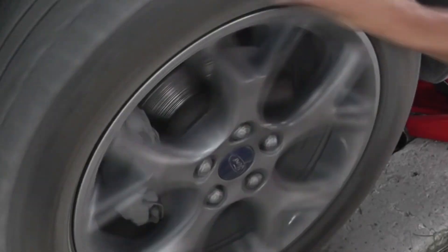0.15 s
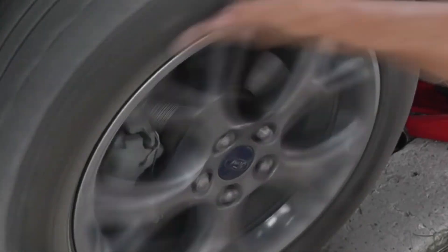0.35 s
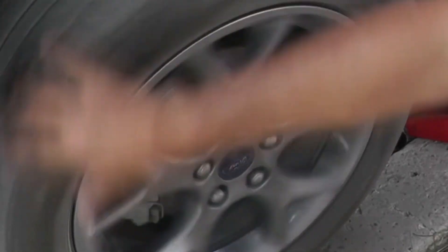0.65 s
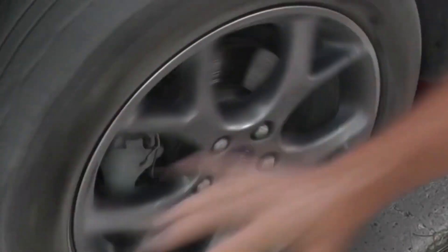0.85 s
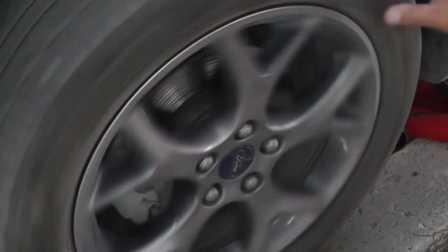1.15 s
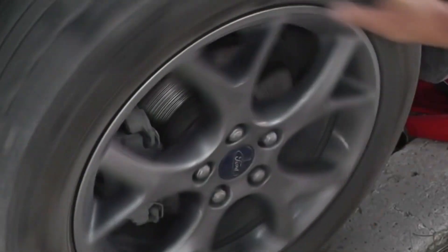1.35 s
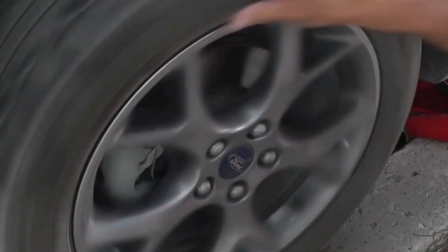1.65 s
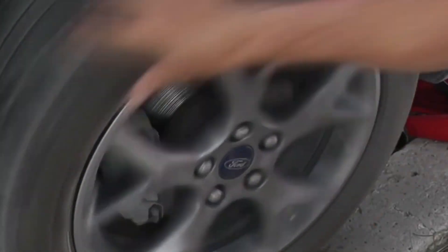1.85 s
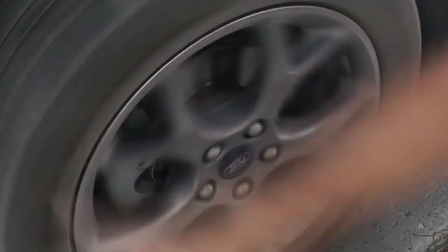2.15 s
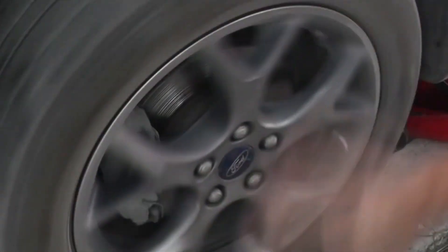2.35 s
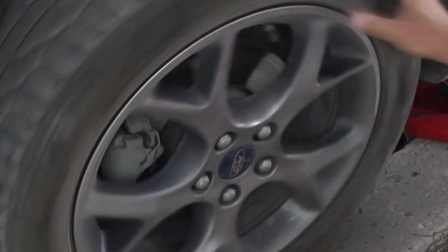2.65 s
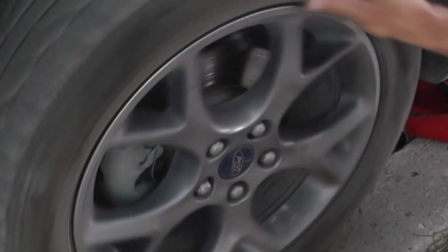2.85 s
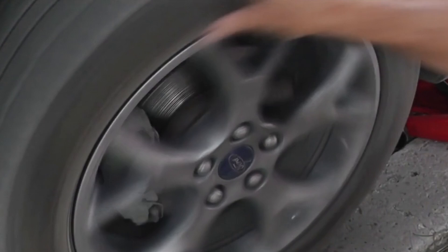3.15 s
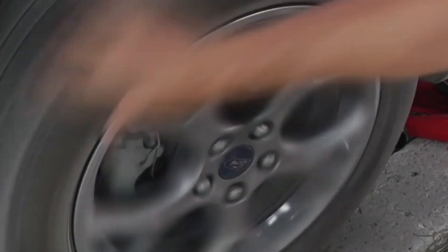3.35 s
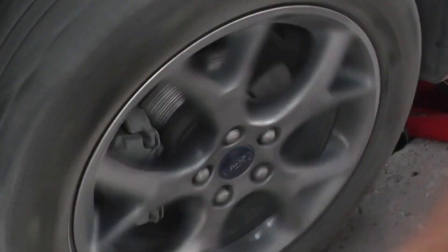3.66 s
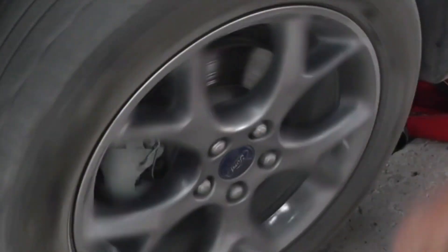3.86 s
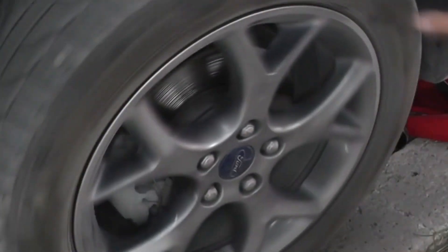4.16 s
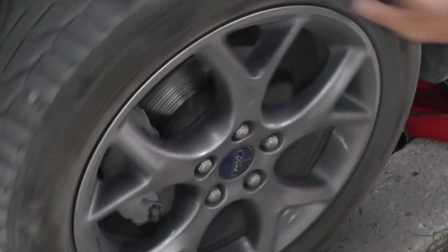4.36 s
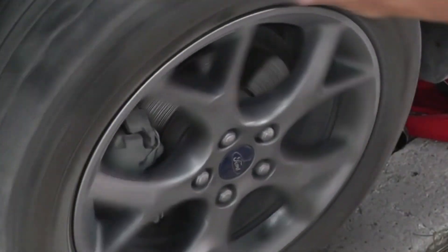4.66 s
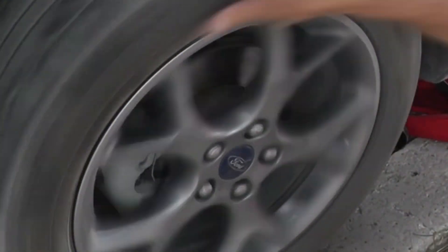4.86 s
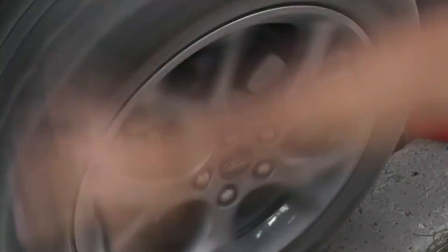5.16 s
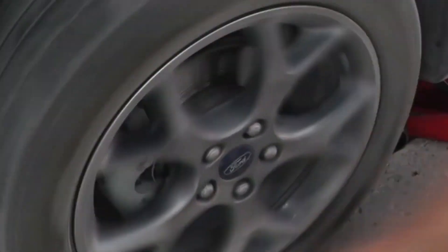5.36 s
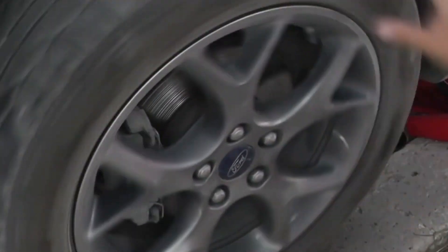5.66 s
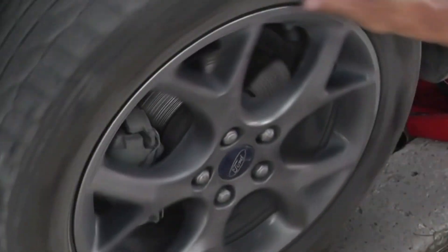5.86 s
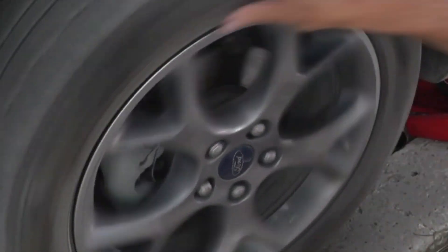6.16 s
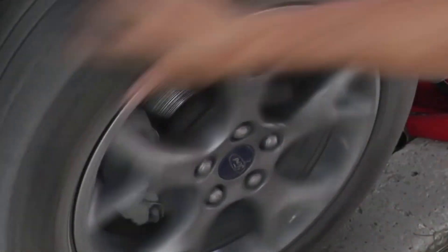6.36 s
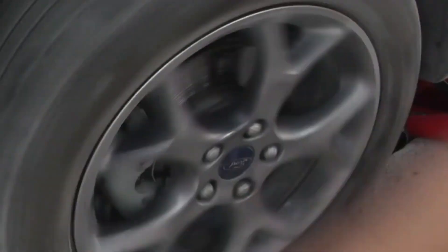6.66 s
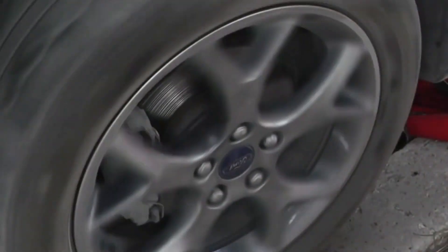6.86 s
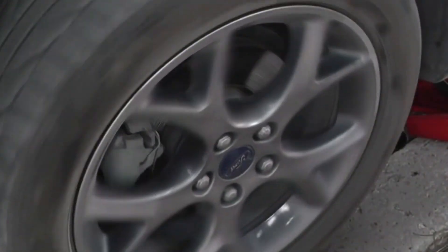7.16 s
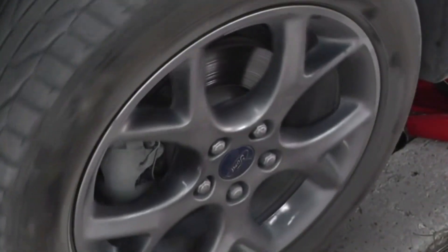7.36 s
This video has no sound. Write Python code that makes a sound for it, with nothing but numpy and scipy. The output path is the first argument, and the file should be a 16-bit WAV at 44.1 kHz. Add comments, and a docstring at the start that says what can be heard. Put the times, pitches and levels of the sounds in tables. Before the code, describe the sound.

Close, dry, single-channel sound of a jacked-up car wheel spun by hand. Worn pads on the disc give a very high, thin, piercing squeal that stutters on and off, sometimes joined by a second, lower one. Beneath is a continuous gritty, hissing scrape that swells with each push and sags as the wheel slows, plus a low rumble and occasional soft palm thumps on rubber.

```python
"""Two piercing squeals, about 7.2 and 5.1 kHz, come and go in bouts over a gritty scrape, a low rumble
and faint hums; soft thumps fall between. A jacked-up car wheel is spun by hand while worn brake pads drag
on the disc. Squeals are faltering sines from two self-excited disc modes; the scrape is coloured noise and
resonances rung by grit; hums are wavering tones blended with narrow noise; a palm's noise bursts ring
the tyre."""
import sys
import numpy as np
from scipy import signal
from scipy.io import wavfile
from scipy.ndimage import uniform_filter1d

SR = 44100
rng = np.random.default_rng(int(sys.argv[2]) if len(sys.argv) > 2 else 0)


def generate_wav(signal):
    """Clip the signal to [-1, 1] and save it as 16-bit WAV at the path in sys.argv[1]."""
    frames = np.transpose(np.atleast_2d(signal))
    scaled = np.clip(frames, -1, 1) * 32767
    pcm = np.round(scaled).astype(np.int16)
    wavfile.write(sys.argv[1], SR, pcm)


N = 330388
TIME = np.arange(N) / SR


def squeals():
    """Friction makes two disc modes squeal by themselves, in bouts with a slightly wandering pitch."""
    # bouts: caught/s, let go/s, level when caught/dB, level when let go/dB
    high_bouts = [(0.0, 0.02, -37, -48), (0.1, 0.2, -40, -45.5), (0.245, 0.29, -35.5, -44),
                  (0.377, 0.49, -31.5, -32), (0.56, 0.67, -22, -22), (0.68, 0.85, -19.5, -25.5),
                  (0.9, 1.12, -21, -26.5), (1.13, 1.235, -27, -35.5), (1.63, 1.68, -33, -42),
                  (1.72, 1.79, -19, -17), (1.82, 2.02, -30, -18), (2.05, 2.255, -16.5, -13),
                  (2.3, 2.5, -30, -29.5), (2.53, 2.57, -25, -22), (2.63, 2.77, -38.5, -39),
                  (2.97, 3.04, -46, -37.5), (3.25, 3.28, -38, -51), (3.33, 3.8, -20, -22.5),
                  (3.845, 3.98, -21, -20.5), (4.01, 4.15, -25.5, -29), (4.18, 4.255, -36, -41.5),
                  (4.75, 4.85, -28.5, -27.5), (4.89, 4.995, -19, -22), (5.02, 5.08, -27.5, -28),
                  (5.11, 5.24, -15.5, -25.5), (5.28, 5.57, -20.5, -23.5), (5.62, 5.7, -34.5, -24.5),
                  (5.72, 5.82, -30, -33), (5.84, 6.0, -35, -28), (6.02, 6.07, -30.5, -38),
                  (6.09, 6.2, -32.5, -30), (6.22, 6.46, -23.5, -30), (6.495, 6.64, -22, -17.5),
                  (6.66, 6.9, -22, -25.5), (6.945, 7.055, -16, -24.5), (7.08, 7.14, -33.5, -33),
                  (7.17, 7.18, -21.5, -24.5), (7.21, 7.29, -34, -34.5), (7.32, 7.49, -27.5, -40)]
    low_bouts = [(0.0, 0.07, -41, -39), (0.116, 0.3, -27, -25), (0.37, 0.46, -23.5, -21),
                 (0.47, 0.5, -19.5, -23), (0.575, 0.64, -28, -31.5), (0.67, 0.78, -39, -45),
                 (0.83, 0.84, -53, -52), (0.89, 0.94, -46, -44), (0.96, 1.03, -50, -47),
                 (1.05, 1.08, -41, -45), (1.13, 1.14, -50, -57), (1.2, 1.22, -42, -51),
                 (1.33, 1.5, -29.5, -39.5), (1.52, 1.75, -38, -39.5), (1.79, 1.82, -50, -55),
                 (1.89, 1.94, -54, -54), (2.02, 2.05, -51, -51), (2.14, 2.18, -50, -52),
                 (2.26, 2.38, -48, -53), (2.445, 2.45, -51, -50), (2.5, 2.61, -45, -49),
                 (2.66, 2.98, -40, -42.5), (3.04, 3.12, -30.5, -37), (3.2, 3.37, -48, -33),
                 (3.46, 3.68, -49, -47), (3.72, 3.8, -48, -36.5), (3.995, 4.16, -37.5, -28),
                 (4.2, 4.29, -29.5, -39), (4.33, 4.44, -39, -33), (4.48, 4.75, -41, -45.5),
                 (4.8, 4.93, -58, -58), (5.29, 5.3, -45, -45), (5.65, 5.76, -44, -60),
                 (5.8, 6.14, -43.5, -39), (6.35, 6.39, -42, -42), (6.49, 6.54, -48, -36),
                 (6.56, 6.7, -41, -66), (6.79, 6.84, -40, -33.5), (6.86, 7.23, -39, -37),
                 (7.295, 7.41, -20, -25.5), (7.455, 7.49, -30.5, -33.5)]
    # pitch of each squeal: t/s, f/Hz
    high_pitch = [(0.0, 7154), (0.45, 7156), (0.6, 7162), (0.85, 7158), (1.2, 7163), (1.63, 7171),
                  (1.8, 7161), (2.0, 7170), (2.28, 7161), (2.52, 7167), (2.7, 7159), (3.27, 7153),
                  (3.77, 7166), (4.2, 7163), (4.75, 7168), (5.0, 7164), (5.1, 7176), (5.3, 7167),
                  (5.6, 7168), (5.75, 7162), (6.45, 7163), (6.78, 7156), (6.93, 7167), (7.2, 7167),
                  (7.49, 7161)]
    low_pitch = [(0.0, 5109), (0.45, 5105), (0.66, 5105), (0.9, 5115), (1.35, 5112), (1.75, 5107),
                 (2.4, 5103), (2.66, 5109), (3.05, 5103), (3.38, 5093), (3.8, 5105), (4.0, 5115),
                 (4.3, 5115), (4.45, 5107), (4.85, 5101), (5.75, 5109), (6.15, 5108), (6.35, 5096),
                 (6.85, 5099), (7.25, 5114), (7.49, 5119)]
    # deeper moments when a squeal falters: t/s, depth/dB, length at half depth/ms
    high_breaks = [(0.574, 8.5, 13), (0.715, 8, 30), (0.791, 9, 17), (0.819, 4, 15), (0.863, 3.5, 24),
                   (0.886, 10, 9), (1.034, 10, 18), (1.192, 10, 12), (1.755, 9.5, 44), (1.85, 6, 8.3),
                   (1.93, 12, 13), (1.975, 13, 17), (2.028, 17, 49), (2.096, 11, 24), (2.138, 6, 20),
                   (2.2, 9, 94), (2.243, 6.5, 8.8), (2.283, 17, 35.4), (2.33, 39, 25.5), (2.369, 16.5, 10),
                   (2.4, 19, 12), (3.38, 6, 11), (3.543, 7.5, 19), (3.569, 13, 16), (3.606, 6, 22),
                   (3.661, 12, 10), (3.703, 8, 8), (3.782, 16.5, 29), (3.826, 18, 22), (3.846, 18, 14),
                   (3.937, 2.5, 18), (4.835, 8, 20), (5.045, 16, 8.8), (5.068, 12, 4.4), (5.139, 5, 55),
                   (5.385, 5.5, 22), (5.527, 5.5, 51), (5.946, 15.5, 26), (6.29, 5.5, 26), (6.331, 8, 7.5),
                   (6.357, 3, 9), (6.385, 0, 9), (6.416, 25, 5.7), (6.508, 15, 8.4), (6.531, 6.5, 17),
                   (6.558, 6.5, 14), (6.601, 11.5, 34), (6.708, 11, 7.4), (6.753, 9, 12), (6.777, 14, 10),
                   (6.814, 13, 28), (6.867, 7, 20), (6.986, 8.5, 103)]
    low_breaks = [(0.176, 9.4, 57), (0.255, 14, 51), (0.336, 5.3, 17), (0.38, 7.7, 11), (0.535, 11.3, 38),
                  (0.62, 5.7, 12), (0.69, 9.9, 15), (0.765, 9.2, 15), (0.97, 6, 15), (1.444, 7.6, 28),
                  (1.548, 21, 23), (1.6, 6.6, 13), (1.63, 6.2, 10), (1.68, 7.8, 22), (2.31, 6, 15),
                  (2.53, 5, 15), (2.7, 5, 17), (2.755, 5, 16), (2.819, 10, 15), (2.895, 5.4, 15),
                  (2.98, 6.6, 48), (3.49, 8, 15), (3.6, 6.9, 30), (4.69, 8.6, 21), (5.745, 9.2, 18),
                  (4.028, 11, 24), (4.592, 16, 20), (5.945, 6.1, 26), (6.071, 14, 27), (7.008, 8.7, 27),
                  (7.033, 11, 21), (7.317, 2.6, 43), (7.43, 12, 26), (0.79, 9, 15), (6.3, 9, 15),
                  (6.33, 12, 12), (6.44, 6, 15), (6.62, 6, 15), (2.57, 6, 15), (2.63, 7, 15)]

    high_db = bout_level(high_bouts, grow_db_per_s=385, die_db_per_s=335)
    low_db = bout_level(low_bouts, grow_db_per_s=327, die_db_per_s=289)
    (high_hz,) = curves(high_pitch)
    (low_hz,) = curves(low_pitch)
    # each octave is heard through a higher mode of the disc: (Hz, width Hz)
    high = squeal(high_db, high_hz, high_breaks, flutter_db=0.9, waver_hz=3.5, fuzz_db=-18.5,
                  octave_db=-38, octave_mode=(14328, 80))
    low = squeal(low_db, low_hz, low_breaks, flutter_db=1.1, waver_hz=3.5, fuzz_db=-18,
                 octave_db=-21, octave_mode=(10234, 16))
    return high + low


def bout_level(rows, grow_db_per_s, die_db_per_s):
    """A mode grows quickly to each catch and rings down when let go; the strongest bout holds."""
    level_db = np.full(N, -90.0)
    for on_s, off_s, on_db, off_db in rows:
        held_db = np.interp(TIME, [on_s, max(off_s, on_s + 1e-3)], [on_db, off_db])
        held_db -= grow_db_per_s * np.maximum(on_s - TIME, 0)
        held_db -= die_db_per_s * np.maximum(TIME - off_s, 0)
        level_db = np.maximum(level_db, held_db)
    return level_db


def squeal(level_db, hz, breaks, flutter_db, waver_hz, fuzz_db, octave_db, octave_mode):
    """A near sine that falters, catches again at a new phase, and carries a thin skirt of noise."""
    slip_rad = np.zeros(N)  # per sample
    jumps = rng.uniform(-0.983, 1, len(breaks))
    for (t_s, depth_db, length_ms), jump in zip(breaks, jumps):
        dip = bell(t_s, length_ms / 1000)
        level_db = level_db - depth_db * dip
        # deeper breaks shift the phase further
        slip_rad += jump * np.pi * min(depth_db / 20, 1) * dip / dip.sum()
    wavering_hz = hz + waver_hz * drift(0.019)
    phase = np.cumsum(2 * np.pi * wavering_hz / SR + slip_rad)
    tone = np.sqrt(2) * np.sin(phase)
    fuzz = amp(fuzz_db) * (drift(0.012) * np.cos(phase) + drift(0.012) * np.sin(phase))
    # the pad presses harder one way than the other: a faint octave, stronger in loud squeals
    octave = amp(octave_db + 0.2 * (level_db + 25)) * np.cos(2 * phase)
    gain = amp(level_db + flutter_db * drift(0.015))
    return gain * (tone + fuzz) + ring(gain * octave, *octave_mode)


def scrape():
    """Grit under the pads: three colours of noise and the modes it rings, with valleys and hollows."""
    # noise colours, normalised afterwards: f/Hz, relative density/dB per Hz
    scrape_colour = [(600, -17), (1500, -5.5), (1900, -6), (2300, -6.5), (2700, -5.5), (3300, -4),
                     (4500, -4), (5400, 4.5), (6300, -6), (7100, 3), (7800, -6), (8200, -33), (9500, -43)]
    hiss_colour = [(6000, -32), (8300, 2), (9800, 5.5), (11500, 2), (13000, -2), (14000, -6.5), (15600, -7)]
    # lasting valleys where neighbouring modes cancel: f/Hz, width/Hz, depth/dB
    valleys = [(330, 50, 4), (860, 50, 2), (1070, 130, 3), (1440, 160, 3), (1910, 100, 9), (2230, 130, 7),
               (2480, 140, 6), (3150, 140, 3), (3540, 110, 4), (3920, 100, 3), (4200, 100, 5),
               (5340, 280, 9), (6140, 120, 3), (6550, 130, 5)]
    # scrape thins or thickens around 2 kHz: t/s, change/dB, length at half height/s
    hollows = [(0.05, -4, 0.091), (0.7, -2, 0.13), (1.05, -4, 0.6), (1.5, 0.5, 0.32), (2.32, -8, 0.059),
               (2.8, -5.5, 0.21), (3.42, -0.5, .15), (4.37, -4.5, 0.12), (6.2, 2.5, 0.11), (7.45, -1.5, .1)]

    rub_db, rumble_db = rubbing()
    rub_swell_db = rub_db - rub_db.mean()
    rumble_re_rub_db = rumble_db - rub_db
    hiss_db = -3 + 1.3 * drift(0.037) - 0.039 * rub_swell_db  # re rubbing
    out = amp(4.5) * noise(scrape_colour, patchy_db=4.8, flicker_db=1.0)
    out += rumble(rumble_re_rub_db)
    out += amp(hiss_db) * noise(hiss_colour, patchy_db=2.2, flicker_db=2.4)
    out += grit_modes(rub_swell_db, rumble_re_rub_db)
    for hz, width_hz, depth_db in valleys:
        out = out - (1 - amp(-depth_db)) * ring(out, hz, width_hz)
    middle = bandpass(out, (1500, 2650))
    return amp(rub_db) * (out + (amp(bumps(hollows)) - 1) * middle)


def grit_modes(rub_swell_db, rumble_re_rub_db):
    """Modes of disc, shield and wheel rung by grit, as narrow noise bands."""
    # f/Hz
    mode_hz = [554, 662, 797, 904, 1190, 1733, 1995, 2352, 2765, 2925, 3450, 3680, 4060, 4315, 4785, 4866,
               5110, 5205, 5528, 5921, 6290, 6363, 6675, 6761, 6992, 7162, 7520, 7978, 9480, 11374, 1275,
               1800, 2045, 3745, 4440, 4570, 6010, 440, 970]
    # for each mode: width/Hz, base level re rubbing/dB
    mode_ring = [(9.1, -12), (32.8, -11.5), (17.4, -11.5), (12, -13.5), (20, -14.5), (20.5, -20), (25, -17),
                 (15, -15.5), (53.7, -11.5), (90, -11.5), (19.3, -14), (59.7, -15), (41, -7.5), (47.7, -6),
                 (30, -13), (20, -5), (9, -5), (20, -11), (15, -11), (25, -7), (60, -5.5), (30, -15.5),
                 (25, -5), (36, -2), (25, -11), (34, -0.5), (90, -8), (45, -12.5), (35, -16.5), (50, -18.5),
                 (25, -21), (50, -28), (35, -19), (25, -10.5), (70, -17), (50, -12), (50, -15), (25, -14.5),
                 (30, -15)]

    out = np.zeros(N)
    for hz, (width_hz, base_db) in zip(mode_hz, mode_ring):
        # each mode swells and fades slowly at random, independently of the others
        swell_db = 2.8 * drift(0.1)
        # high modes, close to singing, follow the rubbing less
        steadier_db = -0.4 * rub_swell_db * (hz > 4500)
        # low modes, in the wheel, follow the rumble
        wheel_db = 0.86 * rumble_re_rub_db * (hz < 1200)
        out += amp(base_db + steadier_db + wheel_db + swell_db) * narrow(hz, width_hz)
    return out


def rumble(level_db):
    """Low rumble of filtered noise, with a lumpy bass beneath, perhaps wind or traffic."""
    # f/Hz, relative density/dB per Hz
    colour = [(20, -42), (60, 4), (110, -18), (200, 3), (420, 2.5), (900, -5.5), (1500, -9.5), (2600, -8.5),
              (5000, -43)]
    # bass lumps and gaps: t/s, change/dB, length at half height/s
    bass_swells = [(0.15, -4, .25), (0.5, 7, 0.18), (1.1, -12, 0.22), (1.33, 8, 0.16), (1.72, 6, .08),
                   (2.35, -9, 0.16), (2.9, 3, .3), (3.72, -11, .1), (4.5, -2, .2), (5.2, -3, .15),
                   (6.02, 3, 0.34), (6.43, -5, 0.11), (6.65, -4, .15)]

    gain_db = level_db - 1 + 1.04 * drift(0.066)
    low_noise = amp(gain_db) * noise(colour, patchy_db=2.7, flicker_db=1)
    bass = bandpass(low_noise, (55, 135))
    bass_db = bumps(bass_swells) + 3.0 * drift(0.082)
    return low_noise + (amp(bass_db) - 1) * bass


def rubbing():
    """Levels in dB of the rubbing, with its rough patches, and of the rumble."""
    # swells with each push, sags as the wheel slows: t/s, rubbing level/dB, rumble level/dB
    push_levels = [(0.0, -50.5, -51), (0.15, -49, -52), (0.45, -46.5, -51.5), (0.77, -50.5, -58),
                   (1.2, -50.5, -55.5), (1.5, -51, -48), (1.85, -46.5, -54.5), (2.1, -48.5, -53),
                   (2.25, -50, -55), (2.55, -50, -52.5), (2.9, -53, -54), (3.15, -46.5, -52),
                   (3.62, -48, -51.5), (3.95, -49.5, -55.5), (4.36, -53.5, -52.5), (4.62, -52.5, -52),
                   (4.78, -47.5, -54), (5.13, -49.5, -53.5), (5.22, -52, -58), (5.5, -53, -56),
                   (5.9, -52.5, -50.5), (6.4, -46, -50), (7.1, -48.5, -52.5), (7.49, -54.5, -56)]
    # rough patches of the disc at the pads: t/s, change/dB, length at half height/s
    patches = [(0.337, 4, 0.083), (0.874, 7, 0.07), (3.707, -3, 0.039), (3.835, 4, 0.035),
               (5.627, 4.5, 0.032)]

    rub_db, rumble_db = curves(push_levels)
    return rub_db + bumps(patches), rumble_db


def slaps():
    """A soft noise burst from palm and fingers rings the tyre wall."""
    # palm on the tyre: t/s, peak level/dB, decay t60 of the burst/s
    palm_hits = [(0.849, -40.5, 0.14), (1.466, -34.5, 0.15), (2.859, -36.5, 0.36), (3.453, -42, 0.066),
                 (3.605, -43.5, 0.11), (4.514, -34, 0.28), (5.965, -34.5, 0.1), (7.336, -38, 0.14)]
    # tyre resonances: f/Hz, width/Hz, relative gain/dB
    tyre = [(196, 90, 21), (432, 90, 22.5), (786, 590, 16), (1260, 69, 17.5)]

    rise_s = 0.007
    out = np.zeros(N)
    t = np.arange(SR // 4) / SR
    for start_s, peak_db, t60_s in palm_hits:
        envelope = amp(-60 * t / t60_s) * np.minimum(t / rise_s, 1) ** 2
        blow = envelope * rng.standard_normal(len(t))
        thump = np.zeros(len(t))
        for hz, width_hz, gain_db in tyre:
            thump += amp(gain_db) * ring(ring(blow, hz, width_hz), hz, 3 * width_hz)
        thump *= amp(peak_db) / abs(thump).max()
        part = out[round(start_s * SR):][:len(t)]  # view into out
        part += thump[:len(part)]
    return out


def hums():
    """Modes close to singing: a wavering tone blended with a narrow ring of noise."""
    # f/Hz
    hum_hz = [404, 1313, 1610, 2121, 4624, 5599, 5787]
    # for each mode: base level/dB, share of rubbing swell, share of rumble swell
    hum_levels = [(-61.5, 0.62, 0.47), (-66, 0.11, 0.97), (-64, 0.46, 0.1), (-69, 0.22, 0.56),
                  (-56, 0.86, 1), (-54, 0, 0.28), (-56, 0, 0)]
    # mode by mode, speaking up or falling silent: t/s, change/dB, length at half height/s
    hum_swells = [
        [(0.32, -18, 0.12), (1.41, 6, 0.19), (2.1, -7, 0.4), (2.73, 7.5, 0.67), (4.21, -24, 0.22),
         (4.56, 15, 0.086), (5.21, -11, 0.043), (5.8, 9.5, 0.31), (6.01, 10.5, 0.12), (6.7, 8.5, 0.72)],
        [(0.27, 6, 0.36), (1.28, 3, 0.51), (2.03, 7, 0.13), (2.68, -3, 0.45), (2.98, 12, 0.12), (4.76, 3, 0.11),
         (5.08, 11, 0.08), (5.86, 0, 0.092), (6.35, 11, 0.13), (6.62, -17, 0.1)],
        [(0.42, 8.5, 0.16), (1.39, 7, 0.17), (1.76, 11.5, 0.1), (2.3, 5, 0.31), (3.21, 8.5, 0.21),
         (3.58, -22, 0.17), (4.39, -13, 0.098), (4.55, 6, 0.09), (5.47, 10, 0.13), (6.55, 11, 0.11),
         (6.71, -25, 0.12), (6.88, 11, 0.57), (7.09, -13.7, 0.067), (7.24, 9, 0.13)],
        [(0.38, 3, 0.25), (0.87, 11, 0.11), (1.18, -10, 0.22), (2.13, 11, 0.049), (3.39, 15.5, 0.21),
         (3.82, 11, 0.18), (4.34, -16, 0.19), (5.2, 9, 0.38), (6.42, 10, 1)],
        [(0.415, 11.5, 0.057), (0.82, 1, 0.63), (2.21, 13, 0.1), (2.46, -4, 0.11), (2.73, 8, 0.21),
         (3.38, 10.5, 0.2), (3.8, 8, 0.087), (3.99, 9, 0.11), (4.87, 11, 0.12), (5.24, 11, 0.11),
         (5.83, 1, 0.12), (5.97, 13.5, 0.05)],
        [(0.15, 15.5, 0.23), (0.6, 17, 0.071), (0.84, -18, 0.046), (1.0, -8, 0.06), (1.02, 8, 0.51),
         (1.21, 11, 0.043), (1.67, 13, 0.065), (1.9, 15.5, 0.029), (2.37, 8.5, 0.29), (2.68, 1, 0.17),
         (2.99, 11.5, 0.27), (3.34, 12, 0.058), (3.48, -17, 0.08), (3.61, 7, 0.11), (3.98, -4, 0.09),
         (4.15, 11, 0.17), (4.31, 3, 0.05), (4.51, 11, 0.05), (4.84, 15, 0.043), (5.24, -14, 0.46),
         (5.62, 14, 0.25), (6.13, 12, 0.049), (6.31, 18, 0.052), (6.47, 12, 0.083), (6.89, 8, 0.24),
         (7.26, 16, 0.074)],
        [(0.23, 11, 0.28), (0.57, -20, 0.09), (0.9, 9, 0.05), (1.34, 10.5, 0.69), (2.13, -5.2, 0.21),
         (2.39, 17, 0.06), (2.81, 20.5, 0.072), (3.12, -5, 0.19), (4.21, 14, 0.2), (4.77, 12, 0.16),
         (5.23, -13, 0.47), (5.78, -3, 0.099), (5.96, 12, 0.072), (6.14, 1, 0.08), (6.44, -9, 0.38),
         (6.56, 19, 0.039), (6.93, 7, 0.25), (7.12, 12, 0.037), (7.33, 13.5, 0.37), (7.38, 13, 0.08)],
    ]

    out = np.zeros(N)
    rub_swell_db, rumble_swell_db = (c - c.mean() for c in rubbing())
    for hz, (base_db, rub_share, rumble_share), swells in zip(hum_hz, hum_levels, hum_swells):
        # the higher the mode, the rougher, wider and more restless its hum
        restless = (hz / 5000) ** 0.22
        noise_share = 0.4 * restless ** 2  # of power
        width_hz, waver_hz, flicker_db = 20 * restless, 6 * restless, 1.9 * restless
        level_db = base_db + rub_share * rub_swell_db + rumble_share * rumble_swell_db
        level_db = level_db + flicker_db * drift(0.05) + bumps(swells)
        phase = 2 * np.pi * np.cumsum(hz + waver_hz * drift(0.05)) / SR
        tone = np.sqrt(2) * np.sin(phase)
        rung = narrow(hz, width_hz)
        out += amp(level_db) * (np.sqrt(1 - noise_share) * tone + np.sqrt(noise_share) * rung)
    return out


def noise(colour, patchy_db, flicker_db):
    """Random short-time spectra with drifting patches and a quick flicker shared across wide bands."""
    size, hop = 512, 128
    hz = np.fft.rfftfreq(size, 1 / SR)
    # axes: (frequency, frame)
    real, imag, patches, flicker = rng.standard_normal((4, len(hz), N // hop + 5))
    patches = evened(uniform_filter1d(uniform_filter1d(patches, 3, 0), 22, 1))
    flicker = evened(uniform_filter1d(uniform_filter1d(flicker, 45, 0), 8, 1))
    colour_hz, colour_db = np.transpose(colour)
    shape_db = np.interp(np.log(hz + 1), np.log(colour_hz), colour_db, right=-80)[:, None]
    spectra = (real + 1j * imag) * amp(shape_db + patchy_db * patches + flicker_db * flicker)
    return evened(signal.istft(spectra, nperseg=size, noverlap=size - hop)[1][:N])


def narrow(hz, width_hz):
    """Noise through a resonance twice, which leaves dark valleys beside it; rms 1."""
    once = ring(rng.standard_normal(N), hz, width_hz)
    return evened(ring(once, hz, 4 * width_hz))


def ring(x, hz, width_hz):
    """One two-pole resonance."""
    return signal.lfilter(*signal.iirpeak(hz, hz / width_hz, SR), x)


def bandpass(x, edges_hz):
    """Zero-phase band, so it can be added back to its source."""
    sos = signal.butter(2, edges_hz, "bandpass", fs=SR, output="sos")
    return signal.sosfiltfilt(sos, x)


def drift(seconds):
    """Slow random curve of rms 1 that changes over about the given time."""
    step_s = 0.004
    knots = np.arange(0, N / SR + 1, step_s)
    span = max(round(seconds / step_s), 1)
    slow = uniform_filter1d(uniform_filter1d(rng.standard_normal(len(knots)), span), span)
    return np.interp(TIME, knots, evened(slow))


def bell(t_s, length_s, time=TIME):
    """A smooth bump of height 1, this long at half height."""
    return np.exp(-np.log(16) * ((time - t_s) / length_s) ** 2)


def bumps(rows):
    """The sum of smooth bumps, each (t/s, height, length at half height/s)."""
    knots = np.arange(0, N / SR + 0.002, 0.002)
    t_s, height, length_s = np.transpose(rows)[:, :, None]
    return np.interp(TIME, knots, (height * bell(t_s, length_s, knots)).sum(0))


def curves(rows):
    """Every column after the time, interpolated at every sample."""
    t_s, *columns = np.transpose(rows)
    return [np.interp(TIME, t_s, column) for column in columns]


def amp(db):
    """Decibels to gain."""
    return 10 ** (np.asarray(db) / 20)


def evened(x):
    """Scales to rms 1."""
    return x / np.sqrt(np.mean(x ** 2) + 1e-20)


def scene():
    """Sum of all sources, one channel."""
    return (squeals() + scrape() + slaps() + hums())[None]


def record(dry):
    """The recorder's band limit: a steep linear-phase low-pass."""
    edge_hz = 15720
    lowpass = signal.firwin(1501, edge_hz, window=("kaiser", 9), fs=SR)
    return signal.oaconvolve(dry, lowpass[None], "same")


dry = scene()
out = record(dry)
generate_wav(out)
```